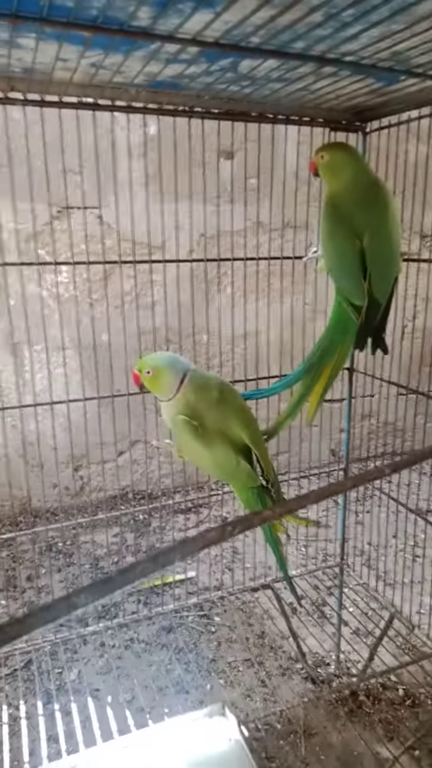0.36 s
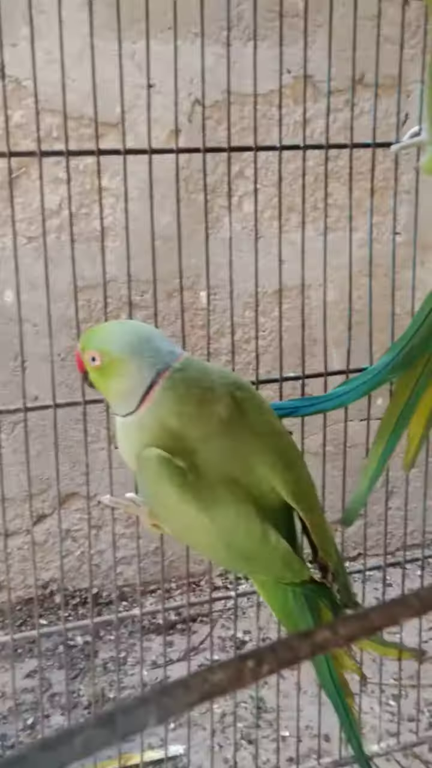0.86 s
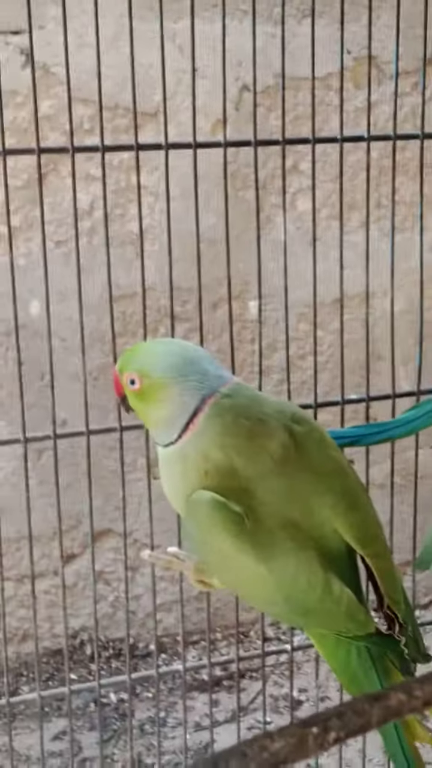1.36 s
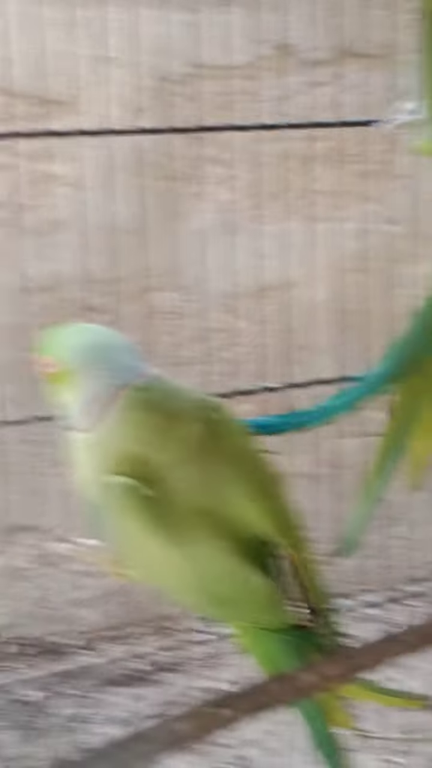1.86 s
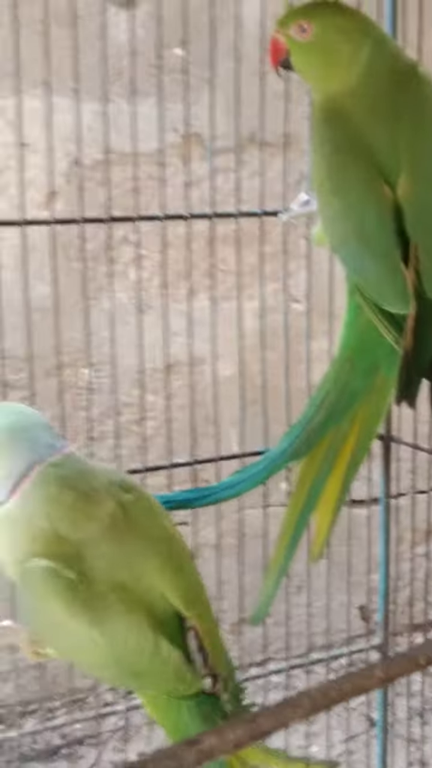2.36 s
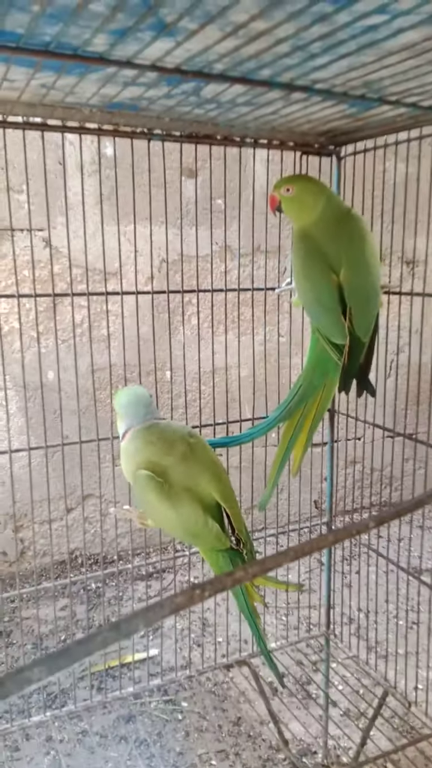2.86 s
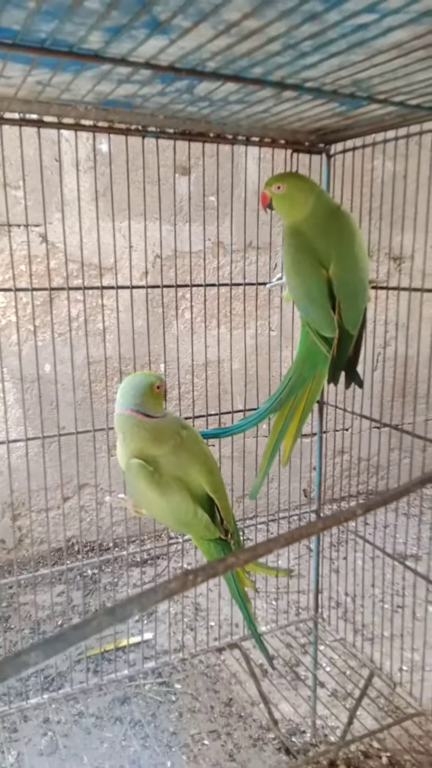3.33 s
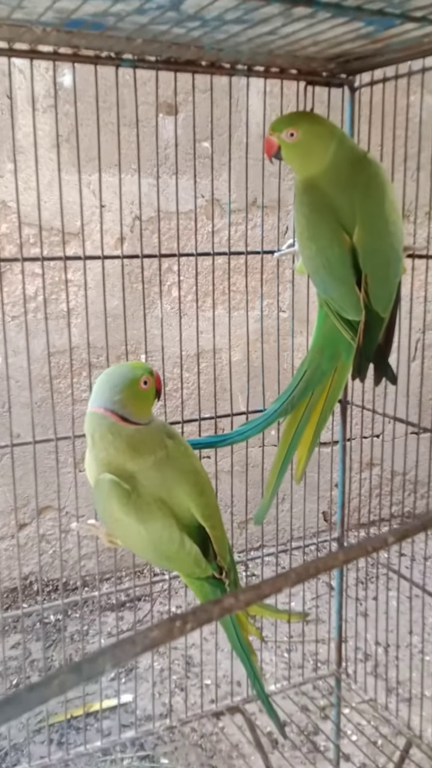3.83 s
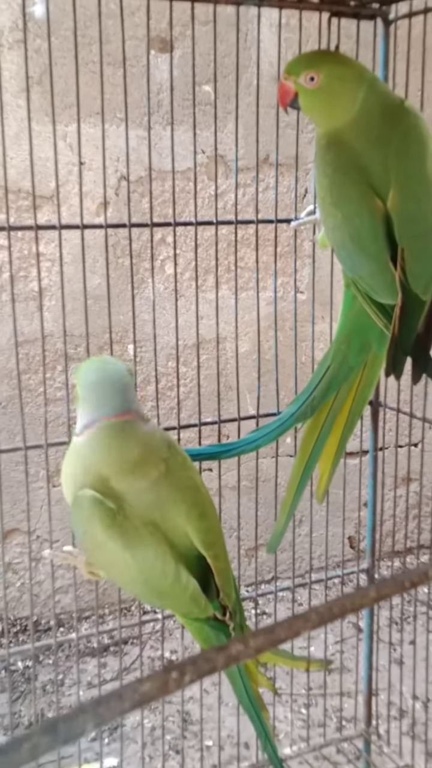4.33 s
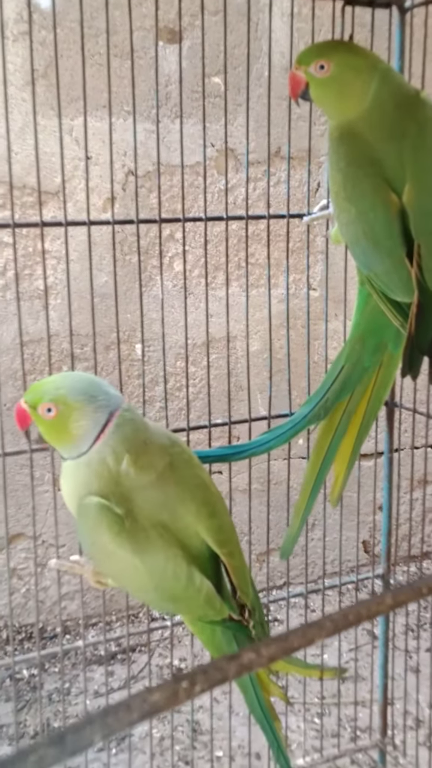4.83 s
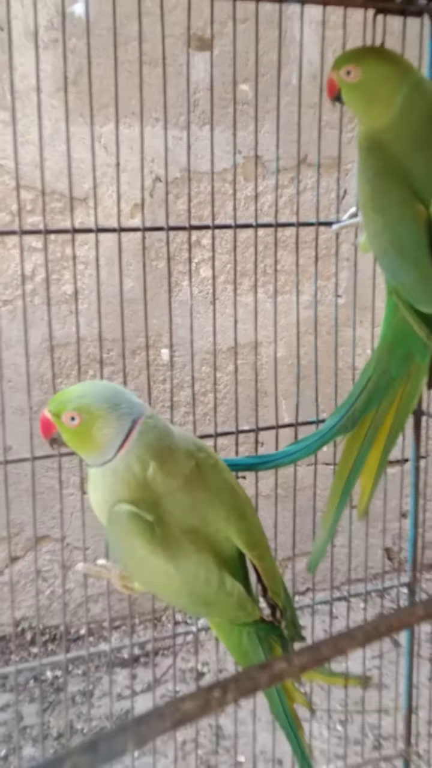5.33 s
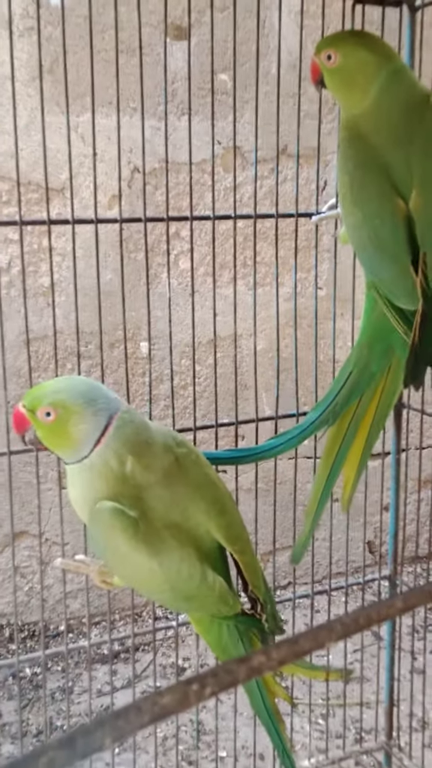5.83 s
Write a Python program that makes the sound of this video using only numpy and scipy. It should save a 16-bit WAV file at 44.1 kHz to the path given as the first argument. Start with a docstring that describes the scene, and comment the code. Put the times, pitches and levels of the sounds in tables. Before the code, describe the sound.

A hoarse parakeet squawk, then short loud arched whistles in groups with bassy pops, answered by a farther bird over faint chatter.

```python
"""A hoarse squawk over faint far chatter, then an arched two-part whistle that makes the bass pop.
The birds are parakeets in a wire cage by a wall, close to a phone; a second one answers from further off.
Whistles are gliding partials filtered by the throat; squawks are harmonic stacks with a fast tremble.
Far birds are short notes and strands of hiss over a faint rumble; decaying noise gives the echoes."""
import sys
import numpy as np
from scipy import signal
from scipy.fft import rfft, irfft
from scipy.io import wavfile
from scipy.ndimage import uniform_filter1d

SR = 44100
rng = np.random.default_rng(int(sys.argv[2]) if len(sys.argv) > 2 else 0)


def volts(x):
    """Linear amplitude factor 10**(x/20) for a level x in dB, scalar or array-like."""
    e = np.asarray(x, float) / 20
    return 10 ** e


def wav_out(sig):
    """Save sig, one row per channel (or a flat mono array), as 16-bit PCM at SR to the path in sys.argv[1]."""
    wavfile.write(sys.argv[1], SR, np.round(np.clip(np.atleast_2d(sig).T, -1, 1) * 32767).astype(np.int16))


N = 262395
T = np.arange(N) / SR  # t/s

# All levels are relative, ahead of any later gain or filter.
# Arched call of the near bird: t/s from the top of the rise, f/Hz, effort level/dB, hiss level/dB,
# flutter (limited to 0-1); each call scales the times and pitches
NEAR_ARCH = [(-.0235, 1741, -57.5, -53.5, 1), (-.0215, 1766, -40.5, -26, .74), (-.004, 2077, -14, -19, 0.5),
             (.000, 2248, -19.5, -17, 0), (.006, 2647, -19, -28.5, 0.01), (.042, 2605, -17, -46.5, 0.01),
             (.054, 2436, -17.5, -54, .68), (.070, 2140, -12.5, -29.5, 1), (.084, 1920, -13.5, -33.5, .45),
             (.094, 1759, -18, -46, 0.9), (.099, 1742, -37, -42.5, 1.2), (.112, 1460, -31.5, -27.5, .55),
             (.122, 1410, -47.5, -54.5, .45)]
# Near calls: t/s, level/dB, pitch factor, length factor, second-partial boost on the plateau level/dB
NEAR_CALLS = [(0.878, -0.5, 1.017, 0.98, 3), (1.166, -1, 1.012, 1.042, -0.5), (1.977, -1, 1.016, 1.05, 2),
              (2.272, -2.5, 1.012, 1.02, 2.5), (4.822, -2.5, 1.013, 0.99, -22),
              (5.11, -2.5, 1.001, .99, -11.5), (5.394, -3, .99, .99, -5), (5.683, -2.5, 1.006, .99, -11.5)]
# Arched call of the answering bird, columns as for the near arch
ANSWER_ARCH = [(-.036, 1498, -61, -52, 0.77), (-.030, 1591, -41, -40.5, .4), (-.010, 2082, -33, -43.5, .4),
               (.003, 2379, -26.5, -42.5, .33), (.034, 2398, -32, -53.5, .47),
               (.044, 2119, -27.5, -42.5, .25), (.066, 1803, -27.5, -48, .25),
               (.100, 1390, -34.5, -49, 0.51), (.108, 1354, -64.5, -59.5, 0.9)]
# Answering calls, columns as for the near calls
ANSWER_CALLS = [(1.108, -1, 0.98, 1.26, -8), (1.291, -5.5, 0.97, 0.48, 0), (1.431, 0, 1.015, 0.94, -27),
                (1.93, -3, 1.0, 0.95, 1), (2.236, -1.5, 1.02, 1.46, 6.5)]
# Strength of partials 1-4 at the syrinx: level/dB
SYRINX_PARTIALS = (1.16, 0.5, -11.5, -9.5)
# What windpipe and beak pass of each whistled partial: f/Hz, level/dB
THROAT_RESPONSE = [(1400, -18), (1900, -12), (2600, -2.25), (3000, 0.5), (4000, -2), (5200, -7),
                   (6200, -9.5), (7300, -11), (7900, -25), (8600, -36.5), (9700, -13), (10600, -10)]
# Air hissing through the whistling beak: f/Hz, level/dB
BEAK_HISS = [(400, -44.5), (900, -16.5), (1800, -7.5), (3900, 1), (7500, -21.5)]
# Loudest bass pops of the near calls: t/s, level/dB, width/ms (never below 0.2)
BASS_POPS = [(0.8778, -14, 1.3), (0.9414, -13.5, 0.55), (0.9488, -18, 4), (0.9534, -9, .21),
             (0.9718, -12.5, 3.4), (1.1656, -16.5, 0.72), (1.2343, -16, 0.37), (1.2441, -13.5, 1.05),
             (1.2573, -14.5, 0.74), (1.9797, -13, 0.72), (2.0293, -13.5, 9.1), (2.0471, -18.5, 2.1),
             (2.054, -11, .21), (2.2724, -9.5, 0.24), (2.3389, -17.5, 0.8), (2.3479, -14.5, .21),
             (4.8214, -8, 0.44), (4.8702, -11.5, 6.3), (4.8836, -15, 1.1), (4.8905, -11, 0.78),
             (4.8956, -7, 0.07), (4.9072, -12.5, 1.1), (5.1091, -4.5, 0.093), (5.175, -14, 1.5),
             (5.183, -10.5, .21), (5.197, -15.5, 2.3), (5.3948, -10, 0.59), (5.4589, -15.5, 0.11),
             (5.4655, -11, 0.16), (5.4689, -16.5, 1.96), (5.6801, -8.5, 0.22), (5.6847, -7.5, 0.41),
             (5.7363, -17.5, 0.19), (5.748, -13, 2.1), (5.7549, -9.5, 0.11)]
# Smaller pops through the fall of each near call: first t/s, mean gap, level and its spread, median width
PATTER_FROM_S, PATTER_GAP_S, PATTER_DB, PATTER_SPREAD_DB, PATTER_MS = .053, .0105, -19.5, 0.5, 1.5

# One contour per hoarse squawk: t/s, f/Hz, level/dB
SQUAWK_CONTOURS = [
    [(.103, 950, -61.5), (.107, 950, -38.5), (.122, 933, -36.5), (.134, 900, -23.5), (.16, 943.6, -16),
     (.25, 953.4, -15), (.31, 927.7, -18), (.335, 861, -27), (.385, 854, -42), (.42, 826, -57.5)],
    [(3.631, 907.5, -49.5), (3.64, 911.2, -28), (3.66, 939.7, -17.5), (3.76, 956.6, -17.5),
     (3.812, 977.8, -19), (3.826, 900, -25.5), (3.835, 900, -80.5)],
]
# Per squawk: tremble f/Hz, second voice above each partial (in pitches), second voice level/dB
SQUAWK_VOICES = [(91.45, 0.76, -6.5), (129.9, .37, -14)]
# Beak colour per squawk, the first narrower: f/Hz, level/dB
SQUAWK_BEAKS = [
    [(600, -61.5), (1000, -42.5), (1300, -12.5), (1850, -16), (2200, -12), (2600, -5), (3300, -6.5),
     (3850, -4), (4400, -12), (5000, -20), (5700, -19), (6600, -22.5), (7600, -35)],
    [(600, -62), (1100, -38), (1400, -13), (1900, -12), (2280, -3), (2500, -14.5), (2800, -5.5), (3300, -3),
     (3850, -1), (4650, -5.5), (5100, -31.5), (5800, -12), (6600, -20), (7600, -33)],
]
RASP_DB = 6
RASP_PER_DB = -0.23  # rasp and second voice gain on the voice as a squawk softens

# Far chirps, strongest at their own pitch: t/s, length t/s, first f/Hz, last f/Hz, level/dB
FAR_CHIRPS = [(0.442, 0.073, 2830, 3030, -53.5), (0.557, 0.16, 2350, 2055, -69.5),
              (1.62, .25, 1330, 1300, -80), (3.051, 0.069, 2606, 1680, -58.5),
              (3.105, 0.11, 2985, 2700, -63), (3.247, 0.059, 3140, 3060, -62.5),
              (3.306, 0.018, 1490, 1500, -40), (3.313, 0.0092, 2490, 2400, -51),
              (4.10, 0.28, 1950, 2850, -68), (4.181, 0.23, 1338, 1380, -76), (4.29, 0.28, 2442, 1643, -65),
              (4.326, 0.2, 1012, 895, -68.5), (4.372, 0.15, 3035, 2460, -62),
              (4.749, 0.059, 1550, 1670, -49.5)]
# Far cries, strongest high in their stack of partials; columns as for the chirps
FAR_CRIES = [(0.734, 0.13, 2120, 2110, -73), (1.83, 0.078, 990, 940, -67), (2.63, 0.17, 744, 689, -66.5),
             (3.526, 0.12, 900, 880, -61), (4.445, 0.28, 837, 837, -61), (4.694, 0.18, 1734, 1720, -56)]
# Low husky coos; columns as for the chirps
FAR_COOS = [(3.17, .08, 800, 755, -71), (3.348, .11, 586, 524, -53), (3.425, 0.11, 509, 481, -65.5)]
CHIRP_SPREAD_HZ = 820
CRY_HZ, CRY_SPREAD_HZ = 3400, 1200
COO_HZ, COO_SPREAD_HZ, COO_WAVER = 900, 390, 0.066

# Ticks of a claw on the wire: t/s, level/dB
CLAW_TICKS = [(3.54, -61)]
# Tick colour: f/Hz, level/dB
TICK_COLOUR = [(4000, -36), (5200, -1.0), (7000, 10.5), (8000, -30)]
# Echo colour of the wall: f/Hz, level/dB
WALL_COLOUR = [(700, -48), (1300, -1), (2500, -3.5), (3400, 0.9), (4300, -0.5), (5500, -0.5), (7500, -2.5),
               (10000, -56)]
# Colour of a later, narrower echo: f/Hz, level/dB
YARD_COLOUR = [(1800, -39.5), (2600, -11.5), (3350, -0.8), (4200, -15.5), (5500, -40.5)]
# Far chatter blurred into hiss: t/s, level/dB, centre f/Hz
CHATTER = [(0.0, -62, 2930), (0.09, -72.5, 3090), (0.452, -50.5, 2805), (0.55, -52, 3100),
           (0.63, -60.5, 2400), (0.84, -88, 3800), (1.62, -70.5, 3320), (1.758, -93, 2723),
           (1.88, -68, 2000), (2.5, -64, 3050), (2.9, -62.5, 2467), (2.99, -73.5, 2500), (3.2, -54.5, 2540),
           (3.281, -65.5, 1900), (3.33, -47.5, 1600), (3.502, -64.5, 2637), (3.97, -68, 2798),
           (4.38, -58.5, 2426), (4.59, -62.5, 3600), (4.78, -54, 1800), (5.05, -61.5, 2800),
           (5.95, -53.5, 2870)]
# Course of the rumble: t/s, level/dB
RUMBLE_COURSE = [(0, -96), (.3, -67.5), (.84, -68), (1.6, -87.5), (1.9, -68.5), (2.5, -81.5), (2.9, -69.5),
                 (3.3, -78), (3.95, -90), (4.45, -75), (4.6, -85.5), (4.8, -74), (5.95, -73.5)]
# Rumble colour: f/Hz, level/dB
RUMBLE_COLOUR = [(40, -37), (70, -5.5), (105, -1.5), (170, -11.5), (300, -31)]
# Colour of the steady background: f/Hz, level/dB
FLOOR_COLOUR = [(18, -46.5), (30, -35.5), (110, -14.5), (859, -18), (1340, -10.5), (1600, -32.5),
                (1870, -6.5), (2250, -15), (6500, -22.5), (8000, -43)]
FLOOR_DB = -71

# Microphone response: f/Hz, level/dB
MIC_RESPONSE = [(40, -8), (90, -0.5), (7000, 1), (8000, -8.5), (11000, -20), (13500, -23.5), (15800, -30.5)]
GATE_DB, GATE_DEPTH_DB = -95.5, -13  # noise suppressor: threshold per bin, deepest cut
SELF_NOISE_DB = -86.5  # of the electronics after the suppressor


def whistles(template, calls, wobble, jolts):
    """Source and filter: harmonics of a gliding pitch weighted by the throat, with turbulent beak hiss."""
    out = np.zeros(N)
    s, hz, effort_db, hiss_db, flutter = np.transpose(template)
    throat_hz, throat_db = np.transpose(THROAT_RESPONSE)
    chops_db = (12, 7, 7, 7)  # the lowest partial breaks up most when the call turns rough
    for at, db, pitch, length, second_db in calls:
        span = slice(int((at + length * s[0]) * SR), int((at + length * s[-1]) * SR))
        t = (T[span] - at) / length
        size = len(t)
        rough = np.clip(np.interp(t, s, flutter), 0, 1)
        glide = pitch * np.interp(t, s, hz)
        unsteady = 1 + (wobble + 0.0098 * rough) * walk(500, size)
        phase = 2 * np.pi * np.cumsum(glide * unsteady) / SR
        plateau = np.exp(-((t - .022) / 0.014) ** 2)
        effort = np.interp(t, s, effort_db)
        call = volts(np.interp(t, s, hiss_db)) * unit(shape(rng.standard_normal(size), BEAK_HISS))
        for k, (source_db, chop_db) in enumerate(zip(SYRINX_PARTIALS, chops_db)):
            level_db = effort + source_db
            level_db += np.interp(np.log((k + 1) * glide), np.log(throat_hz), throat_db)
            level_db += chop_db * rough * np.clip(walk(230, size), -3, .5)
            if k == 0:  # while rough, it flares at each jolt and sinks between
                level_db += np.minimum(3 * rough, 1) * (14 * jolts[span] - 11)
            if k == 1:
                level_db += second_db * plateau
            call += np.sqrt(2) * volts(level_db) * np.sin((k + 1) * phase)
        # two weak upper partials sound away from the plateau
        upper_level = volts(effort - 26.5 + 7 * np.minimum(walk(200, size), 0))
        call += upper_level * (1 - plateau) ** 2 * (np.sin(5 * phase) + 1.1 * np.sin(6 * phase))
        out[span] += volts(db) * call
    return out


def pops(rows):
    """Impulse response: brief pushes of either sign with crackle; the low cut makes each one swing back."""
    out = np.zeros(N)
    chance = rng.standard_normal((len(rows), 601))
    t_ms = np.arange(-300, 300) / SR * 1000
    for (at, db, width_ms), c in zip(rows, chance):
        push = np.exp(-(1.76 * t_ms / max(width_ms, .2)) ** 2) * np.sign(c[0])
        smooth = uniform_filter1d(uniform_filter1d(c[1:], size=8), size=5)
        crackle = 0.51 * np.exp(-(t_ms / 3.5) ** 2) * smooth
        middle = int(at * SR)
        out[middle - 300:middle + 300] += volts(db) * (1.3 * push + crackle)
    return signal.sosfilt(signal.butter(2, 110, "high", fs=SR, output="sos"), out)


def patter(count=4):
    """Irregular pulse train: rows of small pops at uneven gaps through the fall of each near call."""
    c = rng.standard_normal((len(NEAR_CALLS), count, 3))
    steps = np.arange(count) + .25 * c[..., 0]
    at = np.array(NEAR_CALLS)[:, :1] + PATTER_FROM_S + PATTER_GAP_S * steps
    level_db = PATTER_DB + PATTER_SPREAD_DB * c[..., 1]
    width_ms = PATTER_MS * np.exp(0.82 * c[..., 2])
    return list(zip(at.ravel(), level_db.ravel(), width_ms.ravel()))


def squawks():
    """Modulation: a trembling harmonic stack, a second voice out of step and rasp, through the beak."""
    out = np.zeros(N)
    for rows, (tremble_hz, offset, second_db), beak in zip(SQUAWK_CONTOURS, SQUAWK_VOICES, SQUAWK_BEAKS):
        s, hz, db = np.transpose(rows)
        span = slice(int(s[0] * SR), int(s[-1] * SR))
        t = T[span]
        level_db = np.interp(t, s, db)
        beat = 2 * np.pi * np.cumsum(tremble_hz * (1 + 0.12 * walk(55, len(t)))) / SR
        # fast unevenness, its slow part removed to hold the mean pitch
        jitter = walk(500, len(t))
        jitter = jitter - uniform_filter1d(jitter, size=600)
        drift = 1 + .02 * np.sin(beat) + .011 * jitter
        phase = 2 * np.pi * np.cumsum(np.interp(t, s, hz) * drift) / SR
        voice = sum(np.sin(k * phase + k * k) * volts(6.5 * np.cos(beat + 1.3 * k)) for k in range(1, 16))
        second = sum(np.sin((k + offset) * phase) * volts(3.2 * np.cos(beat + 4.2 * k)) for k in range(1, 8))
        rasp = 1.5 * rng.standard_normal(len(t)) * volts(4 * np.cos(beat))
        rough_part = volts(second_db) * second + volts(RASP_DB) * rasp
        source = voice + volts(RASP_PER_DB * (level_db - max(db))) * rough_part
        out[span] += volts(level_db) * unit(shape(source, beak))
    return out


def far_notes(rows, spread_hz, strong_hz=None, waver=.024, husk_db=-20):
    """Formant emphasis: short unsteady notes whose partials carry best near one region, with some husk."""
    out = np.zeros(N)
    for at, length, first_hz, last_hz, db in rows:
        span = slice(int(at * SR), int((at + length) * SR))
        u = (T[span] - at) / length
        hz = (first_hz + (last_hz - first_hz) * u) * (1 + waver * walk(250, len(u)))
        phase = 2 * np.pi * np.cumsum(hz) / SR
        strong = strong_hz or (first_hz + last_hz) / 2
        note = sum(np.exp(-((k * hz - strong) / spread_hz) ** 2 / 2) * np.sin(k * phase) for k in range(1, 8))
        note = volts(3 * walk(80, len(u))) * unit(note)
        band = [(strong / 3, -30), (strong, 0.1), (strong * 2.3, -12), (strong * 4, -40)]
        note += volts(husk_db) * unit(shape(rng.standard_normal(len(u)), band))
        out[span] += volts(db) * np.sin(np.pi * np.clip(u, 0, 1)) * note
    return out


def tick():
    """Impact: a claw on the wire gives a faint bright burst of filtered noise."""
    envelope = sum(volts(db) * np.exp(-((T - at) / 0.0024) ** 2) for at, db in CLAW_TICKS)
    return shape(rng.standard_normal(N) * envelope, TICK_COLOUR)


def room(x, t60, gap_s):
    """Reverberation: convolution with exponentially decaying noise, coloured by the wall."""
    t = T[:SR // 2]
    tail = rng.standard_normal(len(t)) * np.exp(-np.log(1000) * t / t60) * (t > gap_s)
    tail = tail / np.sqrt(np.sum(tail ** 2))
    return shape(signal.fftconvolve(x, tail)[:N], WALL_COLOUR)


def aviary():
    """Superposition: narrow strands of hiss that come and go independently around a moving centre."""
    s, hiss_db, centre_hz = np.transpose(CHATTER)
    centre = np.interp(T, s, centre_hz)
    hiss = np.zeros(N)
    for hz in 800 * 2 ** np.arange(0, 3.2, 1 / 9):  # nine strands an octave
        band = signal.butter(2, [hz * .97, hz * 1.03], "band", fs=SR, output="sos")
        strand = unit(signal.sosfilt(band, rng.standard_normal(N)))
        fall_db = np.where(hz < centre, 22, 8) * np.log2(hz / centre) ** 2
        hiss += strand * volts(5.5 * walk(26.0) - fall_db)
    return unit(hiss) * volts(np.interp(T, s, hiss_db))


def rumble():
    """Filtered noise: a low band whose level wavers quickly about a slow course."""
    noise = unit(shape(rng.standard_normal(N), RUMBLE_COLOUR))
    return noise * volts(np.interp(T, *np.transpose(RUMBLE_COURSE)) + 5.3 * walk(42))


def steady_floor():
    """Stationary noise: a faint coloured background of constant level."""
    return volts(FLOOR_DB) * unit(shape(rng.standard_normal(N), FLOOR_COLOUR))


def shape(x, points):
    """Linear filtering: weight the spectrum by (f/Hz, level/dB) points on a log-frequency axis."""
    hz, db = np.transpose(points)
    f = np.arange(len(x) // 2 + 1) * SR / len(x) + 1  # +1 avoids log of zero
    return irfft(rfft(x) * volts(np.interp(np.log(f), np.log(hz), db)), len(x))


def unit(x):
    """Normalisation: scale to rms 1."""
    return x / np.sqrt(np.mean(x ** 2))


def walk(rate_hz, size=N):
    """Random modulation: noise averaged twice over 1/rate_hz seconds, rms 1."""
    k = max(int(SR / rate_hz), 2)
    return unit(uniform_filter1d(uniform_filter1d(rng.standard_normal(size), k), k))


def scene():
    """Direct and reflected sound: the near birds arrive mostly direct, the answer mostly as echo."""
    bumps = BASS_POPS + patter()
    jolts = np.minimum(sum(volts(db + 14) * np.exp(-((T - at) / .0016) ** 2) for at, db, _ in bumps), 1)
    near = whistles(NEAR_ARCH, NEAR_CALLS, 0.0018, jolts) + squawks()
    answer = whistles(ANSWER_ARCH, ANSWER_CALLS, .026, np.full(N, .6))
    chirps = far_notes(FAR_CHIRPS, CHIRP_SPREAD_HZ)
    cries = far_notes(FAR_CRIES, CRY_SPREAD_HZ, CRY_HZ, waver=0.004)
    coos = far_notes(FAR_COOS, COO_SPREAD_HZ, COO_HZ, COO_WAVER, husk_db=-2.5)
    far = chirps + cries + coos
    echo = volts(-10.5) * room(near, 0.27, 0.0021)
    echo += room(volts(-2.5) * answer + volts(-6.5) * far, 0.28, 0.013)
    echo += volts(-16.5) * shape(room(near + volts(3.5) * answer, 0.12, .02), YARD_COLOUR)
    answer_heard = volts(-3) * answer + room(answer, .07, .001)
    birds = near + pops(bumps) + answer_heard + volts(3.0) * far
    return (birds + echo + tick() + aviary() + rumble() + steady_floor())[None]


def suppress(x):
    """Spectral subtraction: the phone's noise suppressor turns down each narrow band near the threshold."""
    z = signal.stft(x, nperseg=512, noverlap=384)[2]
    over_time = uniform_filter1d(np.abs(z) ** 2, size=5, axis=1)
    power = uniform_filter1d(over_time, size=2, axis=0) + 1e-18
    gain = np.maximum(1 - volts(GATE_DB) ** 2 / power, volts(GATE_DEPTH_DB))
    return signal.istft(z * gain, nperseg=512, noverlap=384)[1][:N]


def roll_off(x):
    """The treble ends steeply here."""
    return signal.sosfilt(signal.butter(12, 15870, fs=SR, output="sos"), x)


def record(dry):
    """Quadratic distortion: the capsule bends unevenly when loud, leaving low fizz; the top is dull."""
    fizz = signal.sosfilt(signal.butter(2, [170, 900], "band", fs=SR, output="sos"), dry ** 2)
    heard = shape(dry[0] + 0.13 * fizz[0], MIC_RESPONSE)
    mix = suppress(heard)[None] + volts(SELF_NOISE_DB) * rng.standard_normal(N)
    return roll_off(mix)


dry = scene()
out = record(dry)
wav_out(out)
```